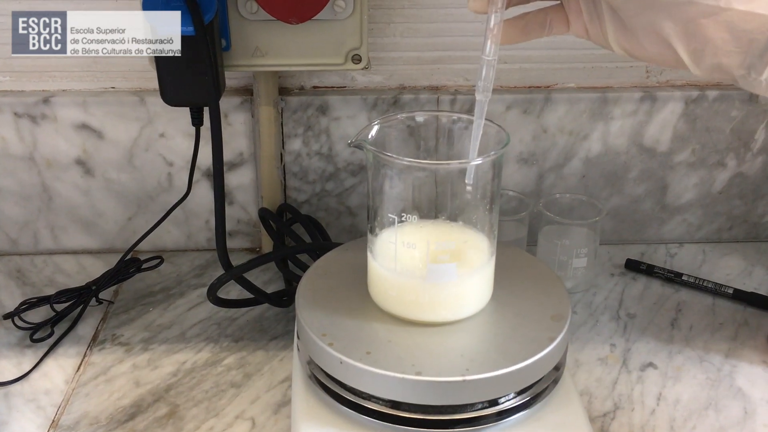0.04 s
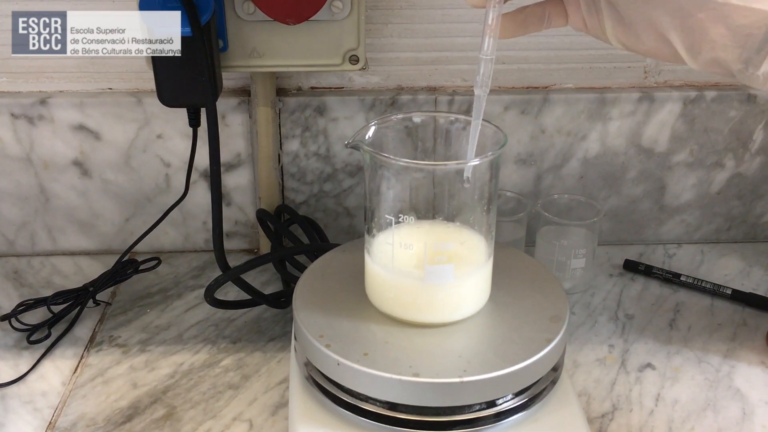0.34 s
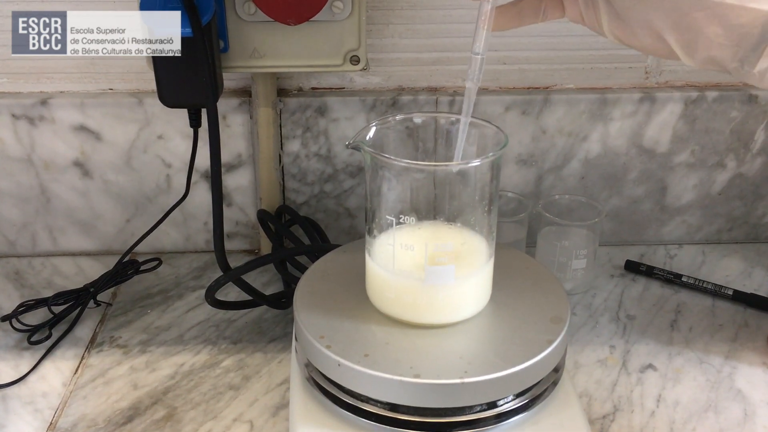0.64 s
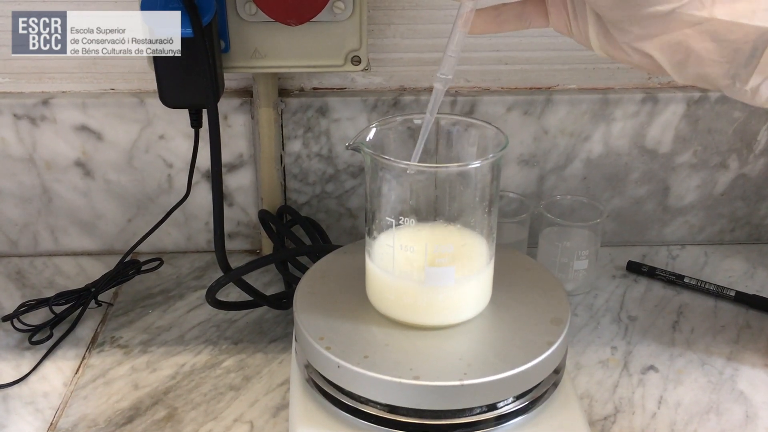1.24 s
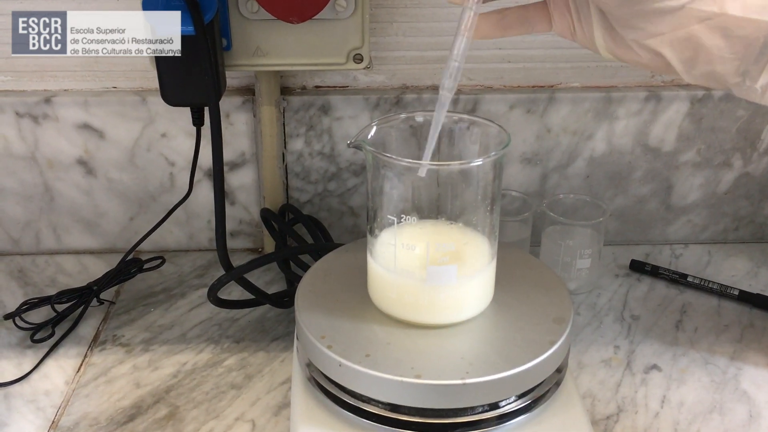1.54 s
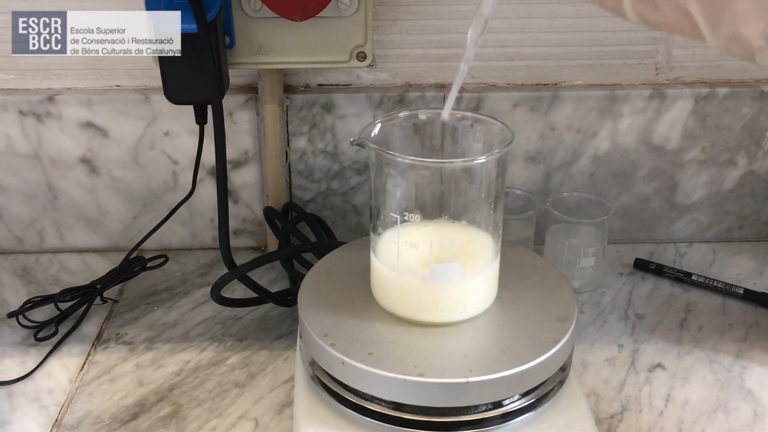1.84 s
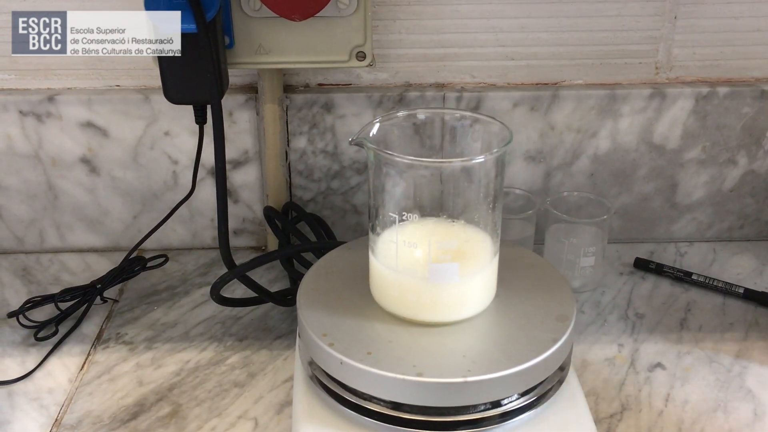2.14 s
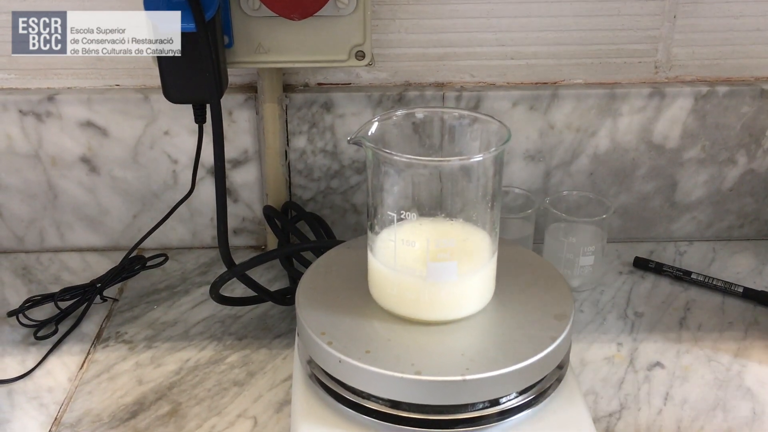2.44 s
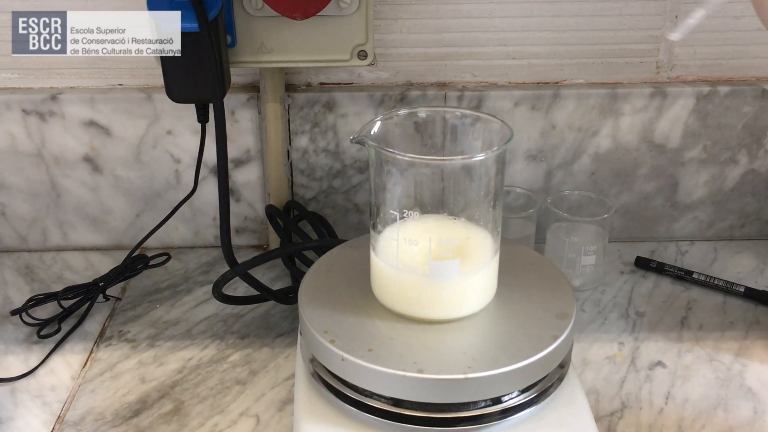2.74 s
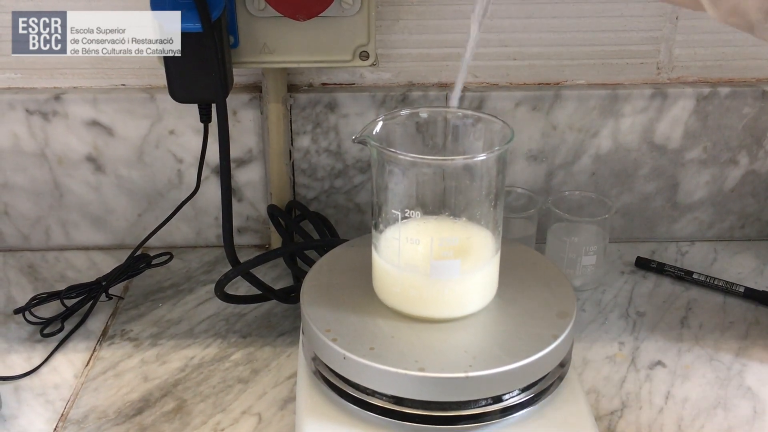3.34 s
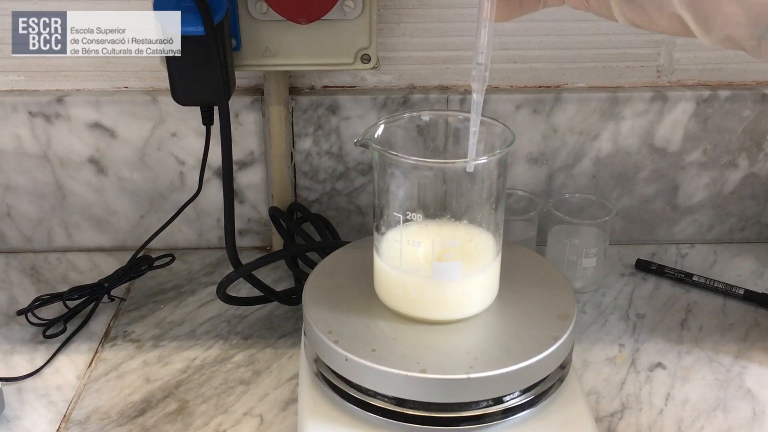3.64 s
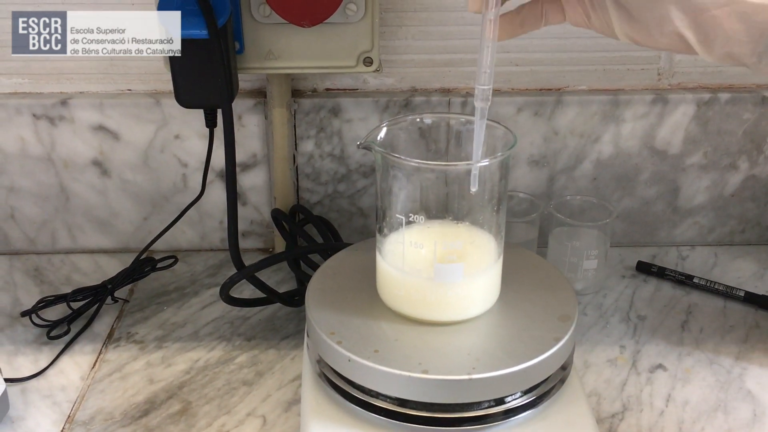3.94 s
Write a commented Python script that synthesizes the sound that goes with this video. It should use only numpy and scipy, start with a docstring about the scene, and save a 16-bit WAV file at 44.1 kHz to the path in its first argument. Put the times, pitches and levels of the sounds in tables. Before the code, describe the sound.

A magnetic stirrer rattles in a glass beaker for all four seconds, five lightly ringing knocks a second, long and short in turn. Beneath it run a low rumble, motor hum and faint fizzing liquid. Small pipette ticks and drips are clearest near 0.5, 1.3 and 1.7 seconds, with faint glove crinkles and a tiny squeak at 1 second. A soft hiss swells around 2.3 and 3.3 seconds.

```python
"""A laboratory bench, where a magnetic stirrer turns in a beaker of milky liquid.
Five times a second it rattles, long and short in turn: tiny contacts thud and ring in plate and beaker.
The drive shakes the bench with a low rumble, under motor whirr, mains hum and faint whines.
The swirling liquid fizzes with tiny bubbles. A pipette held over it ticks, drips and squeaks once,
a glove crinkles faintly, and the room's air hisses."""
import sys
import numpy as np
from scipy import signal
from scipy.fft import rfft, irfft
from scipy.io import wavfile
from scipy.ndimage import uniform_filter1d

SR = 44100
rng = np.random.default_rng(int(sys.argv[2]) if len(sys.argv) > 2 else 0)


def unload_wav(signal):
    """Save mono or channel-first audio to the path in sys.argv[1] as 16-bit WAV at rate SR, clipped to [-1, 1]."""
    wavfile.write(
        sys.argv[1],
        SR,
        np.round(np.clip(np.atleast_2d(signal).T, -1, 1) * 32767).astype(np.int16),
    )


N = 176400
TIME = np.arange(N) / SR
CYCLE_S = .4002   # one long rattle and one short


def rattle(first_s=.0905, long_db=-60, short_db=-63):
    """Every cycle of the stirrer knocks the beaker twice: a long rattle, then a short one."""
    # runs of contacts in each rattle: t/s into the cycle, length/s, relative level/dB
    long_runs = [(0, .0006, 9), (.0065, .012, -1.5), (.0205, .003, 3), (.029, .008, 0)]
    short_runs = [(.2008, .0006, 8), (.208, .008, 1)]
    # accent of each cycle in turn: gain/dB
    accents = [-0.79, -0.46, -0.16, -1.6, -0.66, -0.46, -1.1, -0.81, 0.68, -1.2]
    out = np.zeros(N + SR)
    for k, db in enumerate(accents):
        long_rattle = from_db(long_db) * beaker(contacts(long_runs))
        short_rattle = from_db(short_db) * beaker(contacts(short_runs))
        start = int((first_s + k * CYCLE_S) * SR)
        out[start:start + len(long_rattle)] += from_db(db) * (long_rattle + short_rattle)
    return out[:N]


def contacts(runs, per_s=1500, jitter_s=.00049):
    """One cycle of clicks: runs of tiny, unevenly spaced contacts that push either way."""
    clicks = np.zeros(int(CYCLE_S * SR))
    for offset, length, db in runs:
        count = max(round(length * per_s), 1)
        onset = abs(offset + jitter_s * rng.normal())
        times = onset + length * (np.arange(count) + rng.random(count)) / count
        clicks[(times * SR).astype(int)] += from_db(db) * rng.choice([-1, 1], count)
    return clicks


def beaker(clicks, thud_db=2):
    """Each contact gives a dead thud and sets plate and beaker ringing; rms 1."""
    # modes of plate and beaker: f/Hz, relative level/dB, t60/s
    modes = [(529, -2.5, 0.058), (583, 2.5, 0.053), (712, 0, 0.052), (718, -5, 0.06), (833, -9.5, 0.058),
             (999, -6.5, 0.074), (1264.4, -2.5, 0.051), (1383, -9.5, 0.034), (1634, -15, 0.029),
             (2000, -12, .06)]
    body = sum((-1) ** k * from_db(db) * rms_one(ring(clicks, hz, t60))
               for k, (hz, db, t60) in enumerate(modes))
    thud = from_db(thud_db) * rms_one(ring(clicks, hz=725, t60=.0029))
    return rms_one(band(body + thud, low_hz=386, high_hz=1500))


def rumble(even_s=.14):
    """The turning drive shakes the bench with a low drone that slowly swells and sinks."""
    # colour of the shaking: f/Hz, relative level/dB
    colour = [(18, -46), (27, -30), (35, -15.5), (42, -3.5), (49, -1.5), (58, 1.5), (68, -3), (80, -13),
              (100, -19), (150, -61.5)]
    # its swells: t/s, level/dB
    swells = [(0, -44), (.25, -46.5), (.52, -52), (.8, -45), (.93, -48), (1.04, -43), (1.3, -47),
              (1.65, -48.5), (2, -46), (2.2, -44), (2.5, -46), (2.9, -44), (3.05, -42.5), (3.2, -50.5),
              (3.42, -44.5), (3.67, -46.5), (3.82, -45), (4, -47.5)]
    shake = noise(colour)
    power = uniform_filter1d(shake ** 2, int(even_s * SR)) + 1e-9
    steady = rms_one(shake / np.sqrt(power))   # the drive holds its strength from moment to moment
    return from_db(in_time(swells)) * steady


def whirr(level_db=-54, flicker_db=1):
    """Motor and swirling liquid make a dark, lightly flickering rush."""
    # colour of the whirr: f/Hz, relative level/dB
    colour = [(20, -33), (50, -7.5), (90, -2), (120, 1.5), (165, -6), (290, -7), (400, -13), (600, -16.5),
              (780, -17), (930, -13), (1200, -17.5), (1650, -22.5), (2300, -33), (4000, -45.5)]
    return from_db(level_db + flicker_db * drift(36)) * noise(colour)


def hum(waver_hz=.737, waver_db=3.5):
    """Motor and mains hold low tones under thin whines, each wavering in pitch and level."""
    # motor and mains tones, then the whines: f/Hz, rms level/dB
    tones = [(100, -67.5), (116.5, -67), (126, -68.5), (145.5, -72), (178, -69), (200, -71.5), (267, -80.5),
             (300, -73), (428, -79)]
    whines = [(1981, -88), (2790, -94), (2815, -88), (2863, -93), (2997, -93), (5355, -99), (13938, -99),
              (14189, -98), (14337, -97), (14438, -98), (15589, -97)]
    out = 0
    for hz, db in tones + whines:
        pitch = hz + waver_hz * drift(2.6)
        phase = 2 * np.pi * (rng.random() + np.cumsum(pitch) / SR)
        out += np.sqrt(2) * from_db(db + waver_db * drift(1.2)) * np.sin(phase)
    return out


def pipette(half_width=.096):
    """Small plastic ticks and drips, each a burst of noise in one broad resonance."""
    # ticks and drips: t/s, level/dB, f/Hz
    ticks = [(.172, -62, 2100), (.474, -53.5, 2280), (.543, -59, 2080), (1.187, -64.5, 3100),
             (1.256, -51.5, 3290), (1.524, -64, 3730), (1.696, -54, 2370), (2.038, -66, 3430),
             (2.305, -61, 2040), (2.777, -63, 3750)]
    out = 0
    for start, db, hz in ticks:
        resonance = noise_band(hz * (1 - half_width), hz * (1 + half_width))
        out += from_db(db) * strike(start, attack_s=.0018, t60=.041) * resonance
    return out


def squeak(start_s=1.025, width_s=.025, hz=2460, level_db=-70.5):
    """A brief thin tone swells and fades as the pipette is squeezed."""
    swell = np.exp(-((TIME - start_s) / width_s) ** 2)
    return from_db(level_db) * swell * np.sin(2 * np.pi * hz * TIME)


def glove():
    """The glove flexes in faint, bright crinkles."""
    # crinkles: t/s, level/dB
    crinkles = [(.168, -73), (.335, -75), (.516, -69), (1.335, -69), (1.479, -67.5), (1.710, -67.5),
                (2.21, -68), (2.61, -70)]
    flex = sum(from_db(db) * strike(start, attack_s=.0017, t60=.15) for start, db in crinkles)
    return flex * noise_band(4000, 12700)


def bubbles(per_s=220, spread_db=2.5, ring_cycles=30, tilt_db_per_octave=-.5, level_db=-74.5):
    """The swirling liquid spits tiny ringing bubbles at random, the high ones shorter and fainter."""
    pitches_hz = np.geomspace(922, 10800, 20)
    strengths = from_db(spread_db * np.minimum(rng.exponential(1, N), 3))
    pops = strengths * (rng.random(N) < per_s / SR)
    pitch_index = rng.integers(0, len(pitches_hz), N)
    fizz = 0
    for k, hz in enumerate(pitches_hz):
        tilt = from_db(tilt_db_per_octave * np.log2(hz / pitches_hz[0]))
        fizz += tilt * ring(pops * (pitch_index == k), hz, t60=ring_cycles / hz)
    return from_db(level_db) * rms_one(fizz)


def room_air(air_db=-68.5):
    """A steady bed of air, with a soft treble hiss that swells twice."""
    # colours of the air and the hiss: f/Hz, relative level/dB
    air_colour = [(1000, 8.5), (2400, 4.5), (2980, 5), (3160, 3), (3400, 2.5), (3540, 4), (3950, 1),
                  (4400, 5), (4900, -4), (5500, 1.5), (7600, -2), (9400, 0.5), (10400, -15), (11200, -5),
                  (13400, -6.5), (14400, 2), (14600, -38), (15700, -4)]
    hiss_colour = [(1200, -0.5), (2600, 1), (4500, -5.5), (6300, -3), (9000, -9), (11500, -10),
                   (16000, -29)]
    # swells of the hiss: t/s, level/dB
    swells = [(0, -87), (2.0, -86), (2.2, -69), (2.38, -68.5), (2.55, -76), (2.95, -84), (3.1, -71),
              (3.32, -64.5), (3.45, -70.5), (3.58, -88), (4, -93)]
    return from_db(air_db) * noise(air_colour) + from_db(in_time(swells)) * noise(hiss_colour)


def from_db(db):
    """Decibels to gain."""
    return 10 ** (np.asarray(db) / 20)


def rms_one(x):
    """Scale to rms 1."""
    return x / np.sqrt(np.mean(x ** 2) + 1e-20)


def in_time(rows):
    """Join (t/s, value) rows by straight lines."""
    return np.interp(TIME, *np.transpose(rows))


def noise(colour):
    """Noise shaped by (f/Hz, level/dB) rows; rms 1."""
    hz, db = np.transpose(colour)
    bins = np.maximum(np.fft.rfftfreq(N, 1 / SR), 1)
    gain = from_db(np.interp(np.log(bins), np.log(hz), db))
    return rms_one(irfft(rfft(rng.standard_normal(N)) * gain, N))


def noise_band(low_hz, high_hz):
    """A band of noise; rms 1."""
    return rms_one(band(rng.standard_normal(N), low_hz, high_hz))


def drift(rate_hz):
    """A random wander, mostly slower than rate_hz; rms 1."""
    rolloff = 1 + (np.fft.rfftfreq(N, 1 / SR) / rate_hz) ** 2
    return rms_one(irfft(rfft(rng.standard_normal(N)) / rolloff, N))


def band(x, low_hz, high_hz):
    """Gentle band-pass."""
    return signal.sosfilt(signal.butter(2, [low_hz, high_hz], "band", fs=SR, output="sos"), x)


def ring(clicks, hz, t60):
    """Each click starts a sine that dies by 60 dB in t60 seconds."""
    decay = from_db(-60 / (t60 * SR))
    step = 2 * np.pi * hz / SR
    return signal.lfilter([0, np.sin(step)], [1, -2 * decay * np.cos(step), decay ** 2], clicks + 1e-18)


def strike(start, attack_s, t60):
    """Envelope that rises quickly and dies away."""
    age = np.maximum(TIME - start, 0)
    return np.minimum(age / attack_s, 1) * np.exp(-np.log(1000) * age / t60)


def scene():
    """All sources at one close microphone."""
    stirrer = rattle() + rumble() + whirr() + hum()
    return (stirrer + pipette() + squeak() + glove() + bubbles() + room_air())[None]


def record(dry, cutoff_hz=15700):
    """A steep low-pass takes off the very top."""
    return signal.sosfilt(signal.ellip(12, .1, 70, cutoff_hz, fs=SR, output="sos"), dry)


dry = scene()
out = record(dry)
unload_wav(out)
```